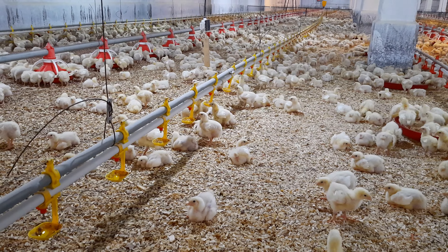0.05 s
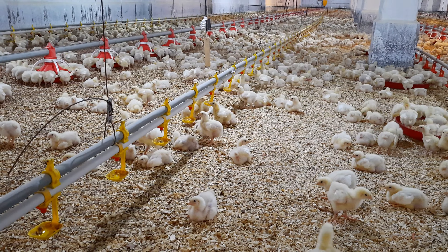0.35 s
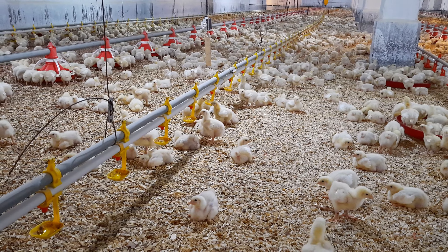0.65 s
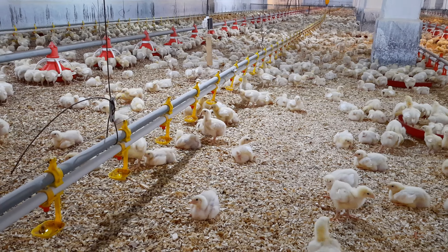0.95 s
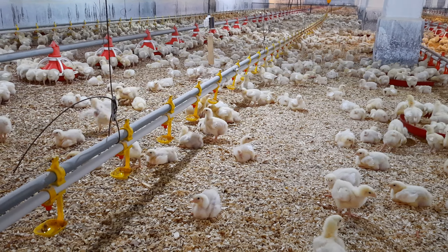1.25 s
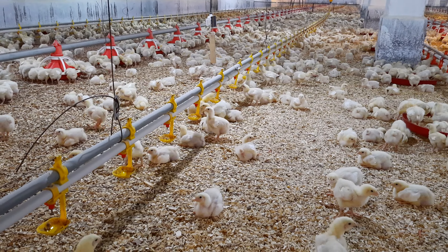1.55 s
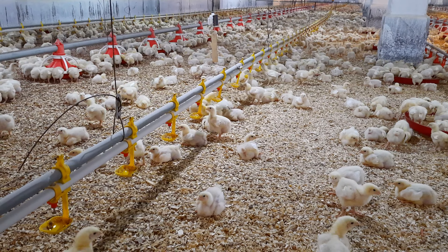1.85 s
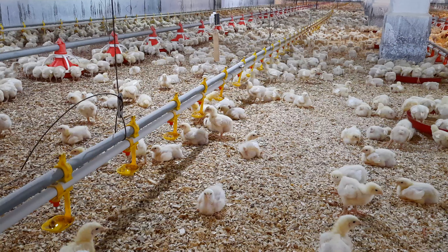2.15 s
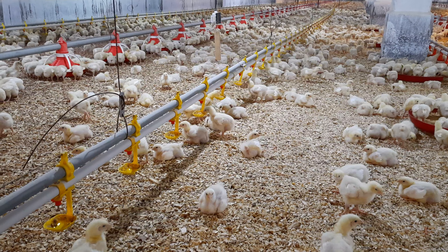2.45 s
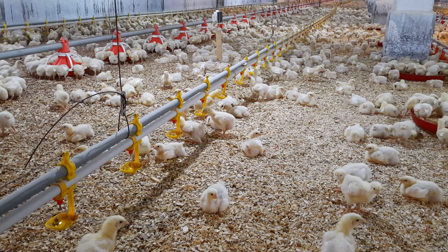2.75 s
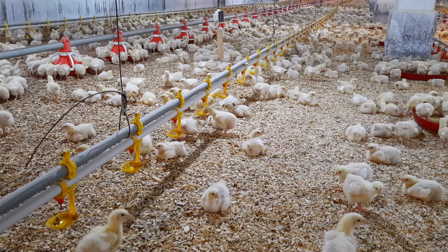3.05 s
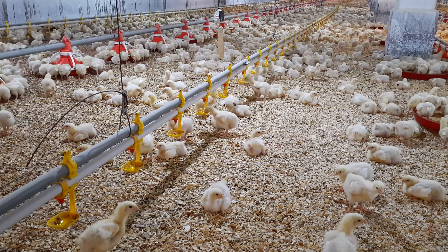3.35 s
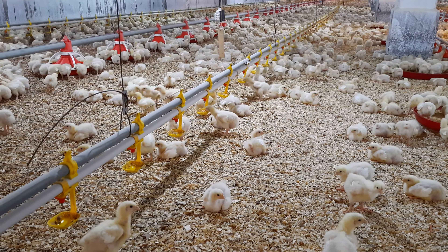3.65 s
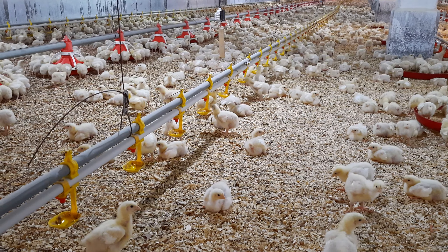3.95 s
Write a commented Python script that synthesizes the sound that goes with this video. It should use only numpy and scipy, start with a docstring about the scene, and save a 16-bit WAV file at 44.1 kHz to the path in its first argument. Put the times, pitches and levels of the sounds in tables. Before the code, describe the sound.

A steady low fan rumble and airy hiss, with young chicks peeping softly.

```python
"""Poultry house with fans

Ventilation fans run steadily in a long shed: a deep rumble, duct resonances, wavering hums.
Air hisses through, partly straight from the left, with thin machinery whines above it.
The flock peeps softly and scratches the litter; nearby chicks give a few faint falling peeps.
Each peep is a sagging whistle; the hall adds a diffuse echo."""
import sys
import numpy as np
from scipy import signal
from scipy.fft import rfft, irfft
from scipy.io import wavfile
from scipy.ndimage import uniform_filter1d

SR = 44100
rng = np.random.default_rng(int(sys.argv[2]) if len(sys.argv) > 2 else 0)


def file_out(sig):
    """Save sig as 16-bit WAV at sys.argv[1]."""
    # one column per channel
    cols = np.atleast_2d(sig).T
    # limit, then scale
    lim = np.clip(cols, -1, 1)
    pcm = np.round(lim * 32767).astype(np.int16)
    wavfile.write(sys.argv[1], SR, pcm)


N = 176400

# Fan rumble spectrum: freq_hz, relative_density_db
RUMBLE_SPECTRUM = [(15, -42), (28, -30), (38, -29), (52, -10.5), (62, -10.5), (76, -2), (102, -0.5),
                   (120, -0.8), (136, -1.55), (160, -9), (180, -10.5), (195, -17), (232, -20.5),
                   (252, -16.5), (280, -15), (298, -12), (320, -11.5), (345, -16), (400, -20.5), (490, -23),
                   (560, -24), (640, -26), (800, -27.5), (1000, -34), (1400, -39.5), (3000, -74)]
# Rumble balance: freq_hz, left_minus_right_db
RUMBLE_BALANCE = [(100, 1.6), (300, 1.5), (420, 3), (680, 7.5), (900, 2.5), (1400, 0)]
# Rumble common to both sides: freq_hz, power_share
RUMBLE_COHERENCE = [(80, .99), (200, 0.95), (320, 0.89), (420, 0.62), (560, 0.67), (800, 0.62),
                    (1100, 0.068)]
# Swell of the rumble's deep boom: time_s, gain_db
BOOM_GAIN = [(0, -.5), (.55, -.5), (1.05, 0), (1.22, -3), (1.37, 3.5), (1.45, .5), (1.55, 3.5), (1.87, 4.5),
             (1.955, -7), (2.0, 1.5), (2.33, 2), (2.6, -2.5), (2.74, 1), (2.9, -2), (3.25, .5), (3.65, -1),
             (3.82, 0), (3.92, 3), (4, 3.5)]
# Swell of the roar above the boom: time_s, gain_db
ROAR_GAIN = [(0, -.5), (.85, 0.5), (1.4, 1.1), (2.1, -0.2), (2.7, 0), (3.5, 0.3), (3.82, 2.2), (4, 0.5)]
# Fan and motor tones: pitch_hz, level_db, wander_rms_hz
FAN_TONES = [(44.2, -35, .5), (103.55, -27, 1.78), (136.7, -34, 1.31), (176.7, -38, 1.01),
             (250.3, -44.5, 1.1), (306.7, -40.5, 1.72), (564.5, -50, 2.1)]
# Air rush spectrum: freq_hz, relative_density_db
AIR_SPECTRUM = [(300, -10.5), (800, 0.5), (1200, 0.5), (1600, -0.1), (1800, -1.5), (2300, .2), (3000, -2.5),
                (3400, -3.5), (4200, -6), (4900, -8.5), (5300, -8), (6200, -8.5), (7300, -13.5),
                (8200, -12), (9800, -19), (11500, -15.5), (13200, -13.5), (15500, -18)]
# Air rush balance: freq_hz, left_minus_right_db
AIR_BALANCE = [(1200, 4.5), (2200, -1.8), (3700, 1), (4700, -4), (6000, -4), (7600, 0.5), (9400, -0.5),
               (10500, 5), (13000, 3), (15500, 1)]
# Swell of the air rush: time_s, gain_db
AIR_GAIN = [(0, -.2), (.65, 0.7), (.95, -0.5), (1.35, 1.2), (1.8, -0.24), (2.75, -0.5), (3.5, -0.4),
            (3.72, 1.3), (4, 0)]
# Machinery whines: centre_hz, level_db, width_hz
WHINE_BANDS = [(3769, -60.5, 25), (5330, -64.5, 220), (6568, -66.5, 28), (7770, -66.5, 35),
               (13420, -62, 105)]
# Near chick calls: start_s, length_s, pitch_hz, level_db, drop_share, rise_db,
# left_minus_right_db, echo_db
NEAR_PEEPS = [(1.3, .04, 3110, -46, 0, 2, -2, -5), (1.473, .115, 3100, -34.3, .17, 11, 6, -8),
              (1.905, .076, 3130, -34.3, .22, 16, 4, -10), (2.336, .045, 3520, -42, .2, 4, 2, -5),
              (2.939, .02, 3010, -37, 0, 0, .5, -10), (3.66, .034, 3490, -37, 0, 1, 5, -7),
              (3.688, .026, 2440, -43, 0, -2, 3, 4)]


def amp(db):
    """Decibels to gain."""
    return 10 ** (np.asarray(db) / 20)


def unit(x):
    """Scale to rms 1."""
    return x / np.sqrt(np.mean(np.abs(x) ** 2) + 1e-20)


def freqs():
    """Bin frequencies of a full-length spectrum."""
    return np.fft.rfftfreq(N, 1 / SR)


def per_bin(table):
    """Table interpolated to the bins on a log-frequency axis."""
    freq_hz, value = np.transpose(table)
    return np.interp(np.log(freqs() + 1), np.log(freq_hz + 1), value)


def swell(table):
    """Gain per sample from a level curve."""
    return amp(np.interp(np.arange(N) / SR, *np.transpose(table)))


def sides(pan_db):
    """Stereo gains for a left-minus-right level."""
    gains = amp(np.array([[pan_db], [-pan_db]]) / 2)
    return gains / np.sqrt(np.mean(gains ** 2, 0))


def add(mix, start_s, sound):
    """Mix in a stereo sound."""
    part = mix[:, max(round(start_s * SR), 0):][:, :sound.shape[1]]
    part += sound[:, :part.shape[1]]


def filtered(x, bin_gain):
    """Zero-phase filter."""
    return irfft(rfft(x) * bin_gain, N)


def lowpass(x, cutoff_hz):
    """Steep low-pass."""
    return filtered(x, 1 / (1 + (freqs() / cutoff_hz) ** 8))


def drift(rate_hz):
    """Slow random motion, rms 1."""
    return unit(filtered(rng.standard_normal(N), np.exp(-(freqs() / rate_hz) ** 2) * (freqs() > 0)))


def noise_pair(spectrum, balance, coherence, left_lead_s=0):
    """Coloured stereo noise with a part common to both sides."""
    f = freqs()
    common, left, right = np.exp(2j * np.pi * rng.random((3, len(f))))
    shared = np.array([common, common * np.exp(-2j * np.pi * f * left_lead_s)])
    bins = np.sqrt(coherence) * shared + np.sqrt(1 - coherence) * np.array([left, right])
    return unit(irfft(bins * amp(per_bin(spectrum)) * sides(per_bin(balance))[:, 0], N))


def rumble(level_db=-18, split_hz=200):
    """Blade turbulence booms in ducts and shed; the boom surges more than the roar above it."""
    noise = amp(level_db) * noise_pair(RUMBLE_SPECTRUM, RUMBLE_BALANCE, per_bin(RUMBLE_COHERENCE))
    boom = lowpass(noise, split_hz)
    return boom * swell(BOOM_GAIN) + (noise - boom) * swell(ROAR_GAIN)


def hums(waver_rate_hz=3, waver_db=2, pan_db=3):
    """Blade and motor tones waver in the draught."""
    out = np.zeros(N)
    for pitch_hz, level_db, wander_hz in FAN_TONES:
        turns = np.cumsum(pitch_hz + wander_hz * drift(waver_rate_hz)) / SR + rng.random()
        out += amp(level_db + waver_db * drift(waver_rate_hz)) * np.sqrt(2) * np.sin(2 * np.pi * turns)
    return out * sides(pan_db)


def patchy(noise, depth_db=1.5, width_hz=260, life_s=.06, frame=512):
    """Narrow patches of a noise come and go independently."""
    bins = signal.stft(noise, nperseg=frame)[2]
    field = rng.standard_normal(bins.shape[1:])
    for axis, cells in enumerate((width_hz * frame / SR, life_s * SR / (frame / 2))):
        field = uniform_filter1d(field, max(round(cells), 1), axis)
    return unit(signal.istft(bins * amp(depth_db * unit(field)), nperseg=frame)[1][:, :N])


def air(level_db=-36, flutter_db=.27, flutter_hz=35, direct_share=.27, left_lead_s=.00041):
    """Rushing air, partly straight from the left, swells, flutters and shifts in colour."""
    gain = amp(level_db + flutter_db * drift(flutter_hz)) * swell(AIR_GAIN)
    return gain * patchy(noise_pair(AIR_SPECTRUM, AIR_BALANCE, direct_share, left_lead_s))


def whines():
    """Narrow, fuzzy machinery tones."""
    out = np.zeros((2, N))
    for centre_hz, level_db, width_hz in WHINE_BANDS:
        peak = 1 / (1 + (2 * (freqs() - centre_hz) / width_hz) ** 2)
        out += amp(level_db) * unit(filtered(rng.standard_normal((2, N)), peak))
    return out


def peep(length_s, pitch_hz, level_db, drop_share, rise_db, pan_db,
         sag_hz_per_s=3200, break_lead_s=.022, break_width_s=.006, fade_s=.007, overtone_db=-26):
    """A chick's whistle sags; with a drop, it breaks to a lower, rougher closing note."""
    t = np.arange(0, length_s, 1 / SR)
    remaining_s = t[-1] - t
    jitter, flutter = unit(uniform_filter1d(rng.standard_normal((2, SR)), size=120))[:, :len(t)]
    fall = (drop_share > 0) * (.5 + .5 * np.tanh((break_lead_s - remaining_s) / break_width_s))
    glide_hz = pitch_hz * (1 - drop_share * fall + .011 * jitter) - sag_hz_per_s * t
    phase = 2 * np.pi * np.cumsum(glide_hz) / SR
    tone = np.sqrt(2) * (np.sin(phase) + amp(overtone_db) * np.sin(2 * phase))
    fades = np.minimum(t / fade_s, 1) * np.minimum(remaining_s / fade_s, 1)
    break_dip = 1 - .5 * np.sin(np.pi * fall) ** 2
    roughness = 1 + (.24 + .35 * fall) * flutter
    gain = amp(level_db - rise_db * remaining_s / t[-1])
    return sides(pan_db) * gain * fades * break_dip * roughness * tone


def shed_echo(x, t60_s=1, build_s=.017):
    """Diffuse echo of the long hall."""
    t = np.arange(SR) / SR
    tail = rng.standard_normal((2, SR)) * np.exp(-np.log(1000) * t / t60_s) * np.minimum(t / build_s, 1)
    return signal.fftconvolve(x, tail / np.linalg.norm(tail[0]), axes=1)[:, :N]


def flock(rate_per_s=13, pitch_hz=2654, spread_db=9, echo_db=-47.5, direct_db=-56.5):
    """Distant chicks peep at random, heard mostly as echo."""
    calls = np.zeros((2, N))
    for when, long, high, loud, drop, side in rng.random((int(rate_per_s * N / SR), 6)):
        call = peep(.04 + .091 * long, pitch_hz * (.75 + .5 * high), spread_db * loud,
                    drop_share=.28 * drop, rise_db=6, pan_db=8 * (side - .5))
        add(calls, when * N / SR, call)
    return amp(echo_db) * unit(shed_echo(calls)) + amp(direct_db) * unit(calls)


def cheeps(rate_per_s=20, pitch_hz=5330, max_db=-56):
    """Tiny high cheeps scattered over the floor."""
    out = np.zeros((2, N))
    for when, long, high, loud, side in rng.random((int(rate_per_s * N / SR), 5)):
        call = peep(.015 + .02 * long, pitch_hz * (.97 + .06 * high), max_db - 5 * loud,
                    drop_share=0, rise_db=0, pan_db=8 * (side - .5))
        add(out, when * N / SR, call)
    return out


def rustle(rate_per_s=320, level_db=-60.5, centre_hz=5000, width_oct=.51, grain_s=.0025):
    """Small feet scratch the litter in loose clumps."""
    hits = rng.random((2, N)) < rate_per_s / SR
    size_db = 3 * np.minimum(rng.exponential(1, (2, N)), 3)
    clump_db = 3.5 * np.tanh(drift(rate_hz=9.2))
    steps = hits * amp(size_db + clump_db)
    steps = steps + .5 * steps[::-1]  # each step also reaches the other side
    envelope = signal.lfilter([1], [1, -np.exp(-1 / (grain_s * SR))], steps)
    band = np.exp(-.5 * (np.log2((freqs() + 1) / centre_hz) / width_oct) ** 2)
    return amp(level_db) * unit(filtered(envelope * rng.standard_normal((2, N)), band))


def near_chicks():
    """A few close peeps, each with its share of hall echo."""
    direct, echo_send = np.zeros((2, 2, N))
    for start_s, *voice, echo_db in NEAR_PEEPS:
        call = peep(*voice)
        add(direct, start_s, call)
        add(echo_send, start_s, amp(echo_db) * call)
    return direct + shed_echo(echo_send)


def scene():
    """Birds, machinery and air."""
    birds = flock() + near_chicks() + cheeps() + rustle()
    return rumble() + hums() + air() + whines() + birds


def record(dry, split_hz=220, squeeze_db_per_db=.31, window_s=.029, cutoff_hz=15750):
    """Gentle bass compressor, then a band limit."""
    bass = lowpass(dry, split_hz)
    power = uniform_filter1d(np.abs(signal.hilbert(bass.mean(0))) ** 2, int(window_s * SR))
    gain = unit((power / power.mean() + .12) ** (-squeeze_db_per_db / 2))
    band_limit = signal.firwin(1023, cutoff_hz, window=("kaiser", 10), fs=SR)
    return signal.oaconvolve(dry + bass * (gain - 1), band_limit[None], "same")


dry = scene()
out = record(dry)
file_out(out)
```